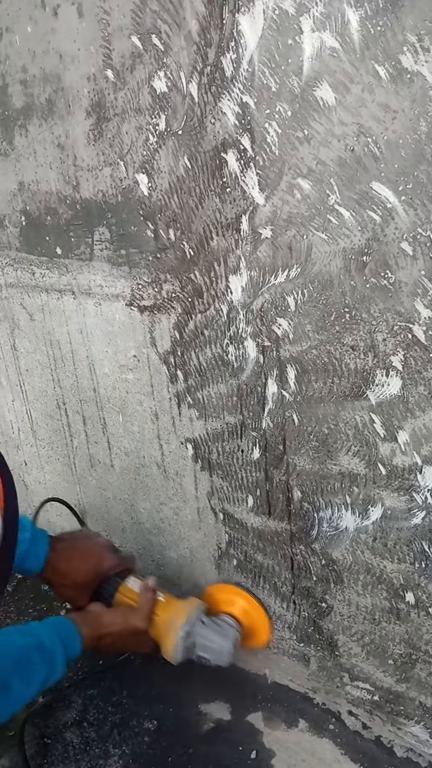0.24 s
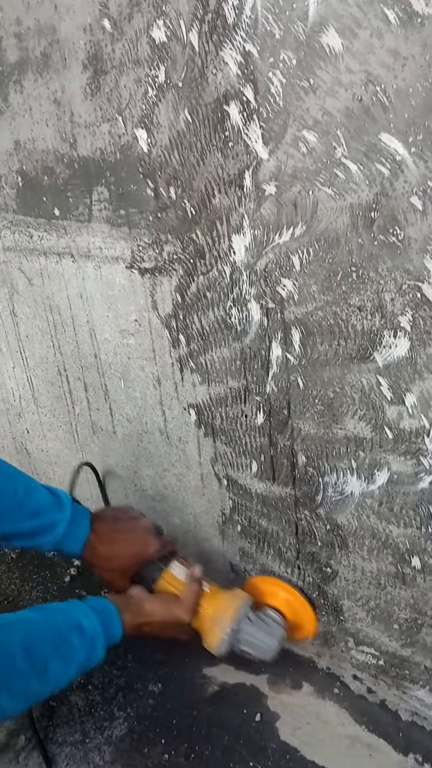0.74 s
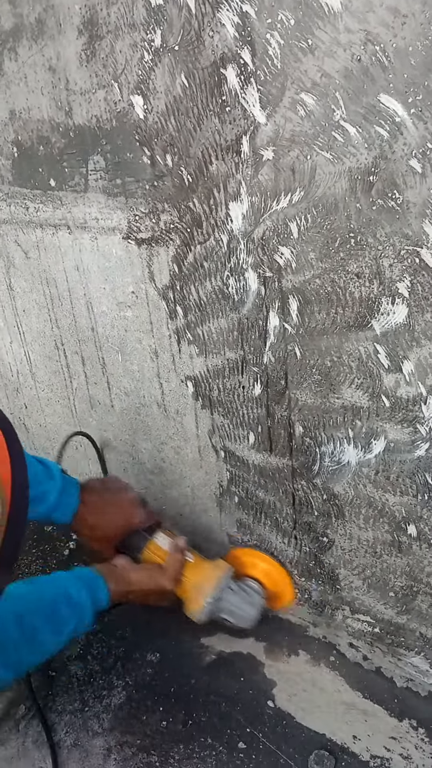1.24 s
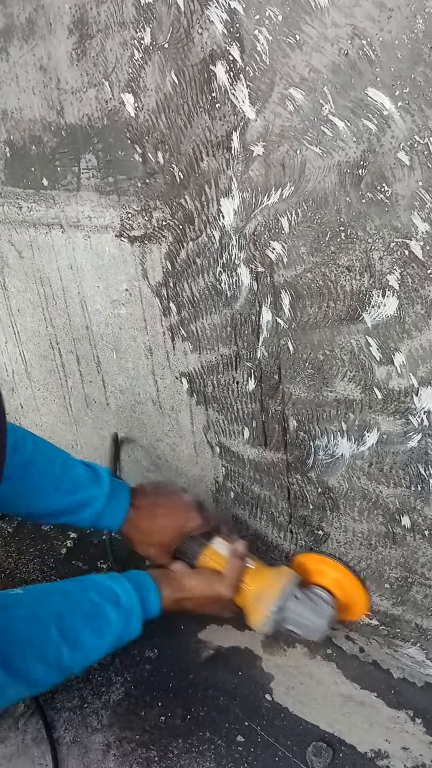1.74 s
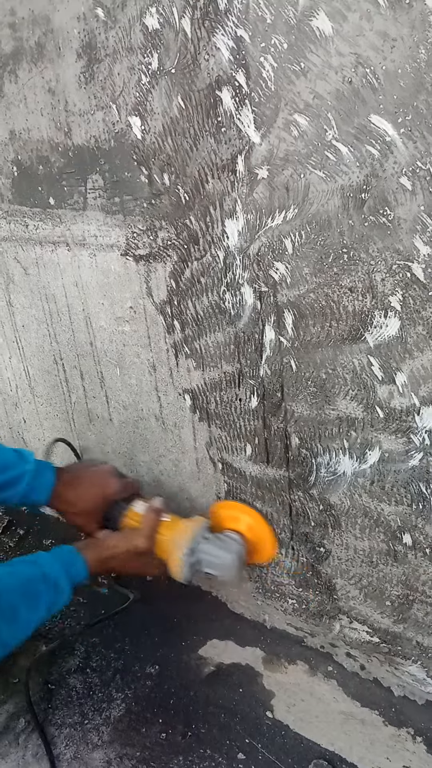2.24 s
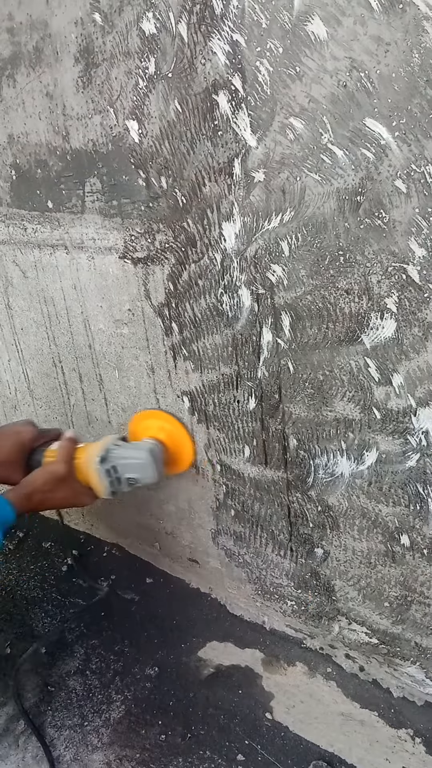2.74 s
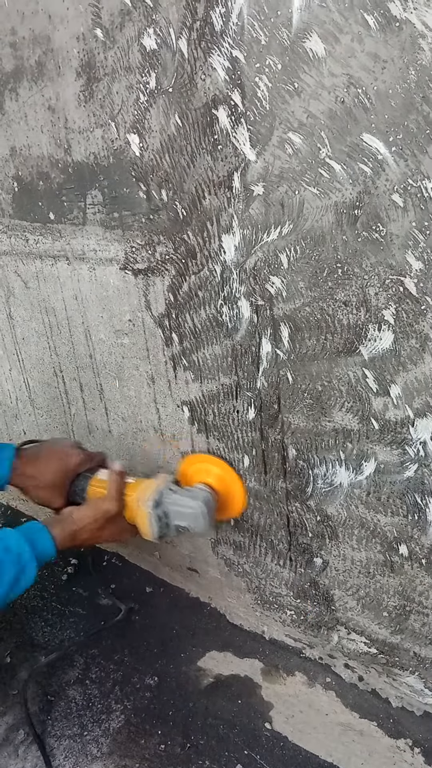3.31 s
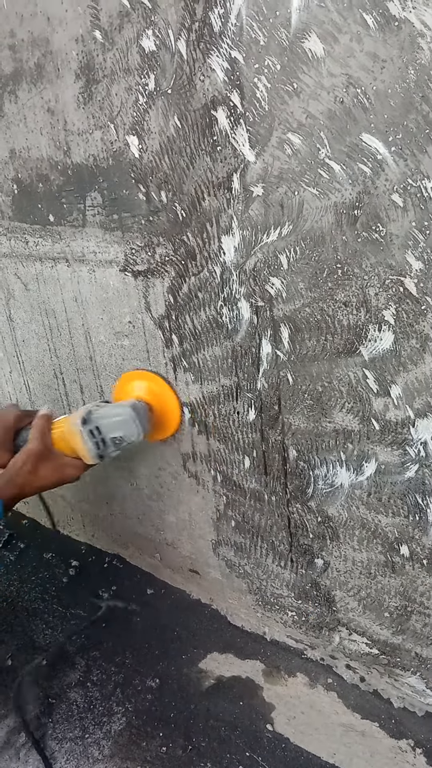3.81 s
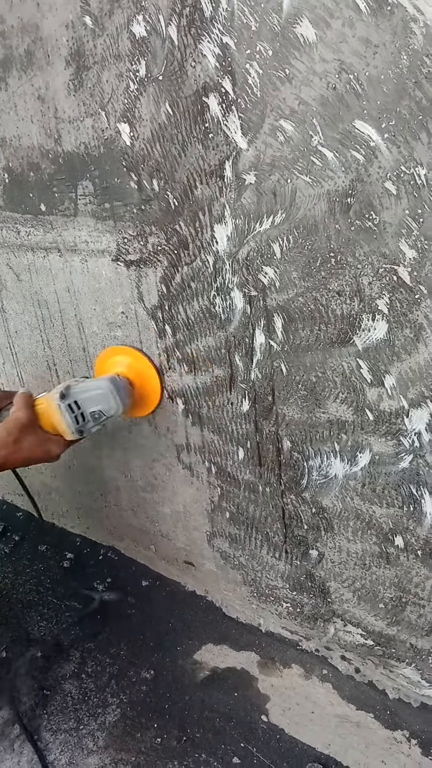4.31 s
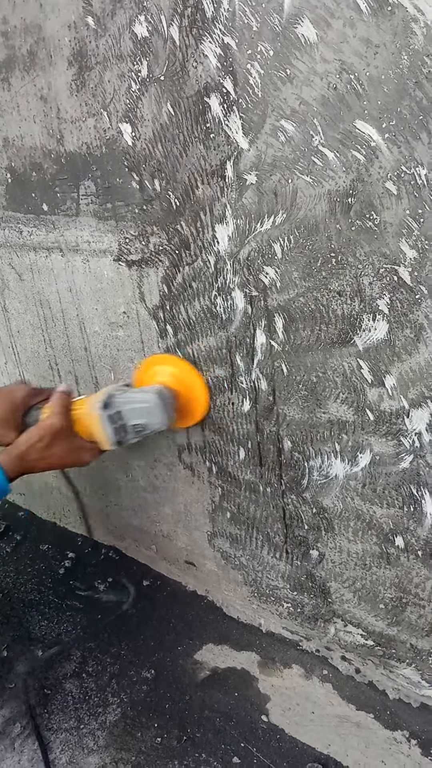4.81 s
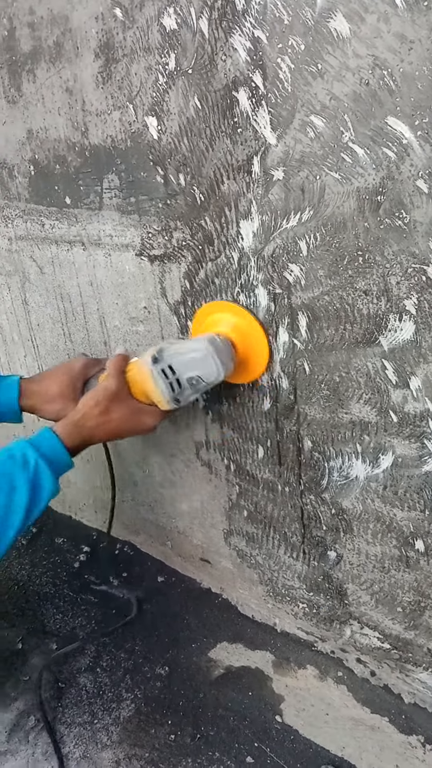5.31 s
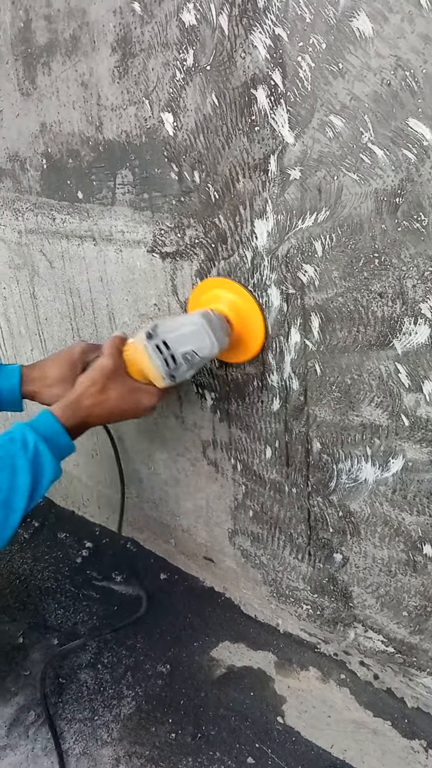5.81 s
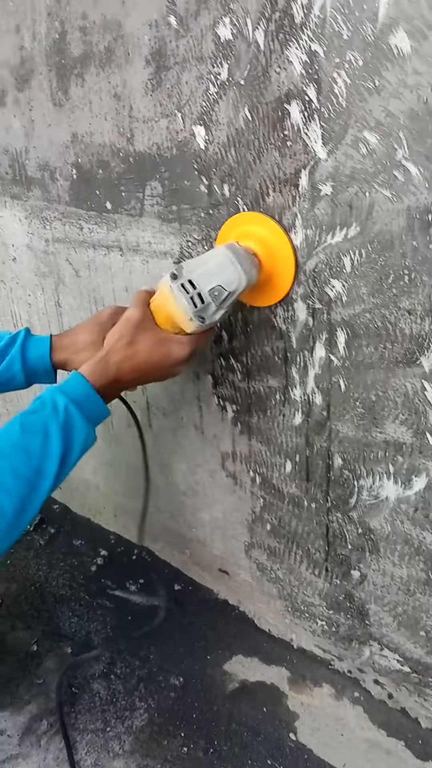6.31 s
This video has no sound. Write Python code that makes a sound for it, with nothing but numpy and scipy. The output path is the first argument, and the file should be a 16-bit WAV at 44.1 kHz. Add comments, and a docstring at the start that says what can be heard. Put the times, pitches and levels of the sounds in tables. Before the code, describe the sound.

From 0 seconds an angle grinder is already at full speed, its steel cup wheel scraping concrete with a loud, bright, gritty rasp that never stops. A fast rough chatter, roughly seventy to a hundred skips a second, textures it, with fine dusty hiss on top. Fan roar and low motor hum lie beneath, and a very thin high whine sags and recovers with each lean. Short runs of hard, rapid knocks come around 0.3, 1.2, 1.8, 2.5 and 3.2 seconds. Steely ringing swells briefly throughout, stronger near 2.7. From about 3.8 the wheel presses harder and the rasp thickens and quickens, fullest around 5, with more knocks near 4.3 and 5.3. A hollow body drone comes and goes. Pressure eases toward 6.5, where it cuts off still grinding. Outdoors, dry, a metre or two away.

```python
"""A steel cup wheel on an angle grinder scrapes and chatters on a concrete wall, a metre or two away outdoors.
Skips and hops form one contact force; it modulates noise for scrape, knocks and dust, and rings steel modes.
Wheel, rim, guard and gear head are two-pole resonances whose levels follow pressure and listed swells.
Underneath: coloured-noise fan roar, sine rotor hum and a thin blade whine that sags at each lean."""
import sys
import numpy as np
from scipy import signal
from scipy.fft import rfft, irfft
from scipy.io import wavfile
from scipy.ndimage import uniform_filter1d, map_coordinates

SR = 44100
rng = np.random.default_rng(int(sys.argv[2]) if len(sys.argv) > 2 else 0)


def output_pcm(signal):
    """Save a mono or channel-first signal as 16-bit PCM at the path in sys.argv[1].

    Samples are clipped to [-1, 1] before scaling.
    """
    pcm = np.clip(np.atleast_2d(signal).T, -1, 1) * 32767
    wavfile.write(sys.argv[1], SR, np.round(pcm).astype(np.int16))


N = 288855

# scrape spectrum: [f/Hz, relative density/dB]
SCRAPE_SPECTRUM = [(500, -9.5), (900, 1.5), (1700, -23), (2050, 5.5), (3000, 4.5), (4200, 3), (5100, 5.5),
                   (5800, 3.5), (6250, 2), (6600, 3), (6900, 0.5), (8000, 0), (9600, -40), (12000, -22)]


def scrape(rub, scrape_db):
    """Rubbing breaks grit: coloured noise under the rub envelope."""
    return colour(rub * grit(spread_db=0.5), SCRAPE_SPECTRUM) * undb(scrape_db - 3.5)


# knock spectrum: [f/Hz, relative density/dB]
KNOCK_SPECTRUM = [(100, -14), (400, -21), (900, -6.5), (1650, -15.5), (2050, -1), (3000, -4.5), (3650, -1),
                  (4300, -4.5), (5300, -2.5), (7000, -5), (9000, -14.5), (10500, -21), (13000, -21),
                  (15500, -25)]


def knocks(knock_force):
    """Hard bounces: noise bursts shaped by the impact force."""
    return colour(knock_force * grit(spread_db=3.5), KNOCK_SPECTRUM) * undb(2.5)


# even-paced hops, one hop = lone knock: [first t/s, last t/s, hops/count, relative level/dB]
HOP_RUNS = [(0.231, 0.35, 5, -28), (0.39, 0.417, 2, -26), (0.626, 0.685, 4, -28), (1.026, 1.052, 2, -27),
            (1.155, 1.345, 8, -27.5), (1.434, 1.448, 2, -26.5), (1.738, 1.867, 5, -28.5),
            (2.474, 2.579, 4, -28), (2.702, 2.728, 2, -25), (2.824, 2.871, 3, -25), (2.951, 2.975, 2, -26),
            (3.096, 3.286, 7, -27.5), (3.997, 4.022, 2, -25.5), (4.222, 4.401, 6, -25.5),
            (4.613, 4.613, 1, -25), (4.873, 4.906, 2, -27), (5.057, 5.057, 1, -25),
            (5.166, 5.227, 3, -26.5), (5.27, 5.395, 5, -25), (5.577, 5.577, 1, -25), (5.842, 5.842, 1, -25),
            (5.893, 5.948, 3, -27.5), (6.199, 6.276, 4, -26.5)]
# softer bounces between runs; nominal rate, spread of the softening
STRAYS_PER_S, STRAY_MAX_DB, STRAY_SPREAD_DB = 11, -28, 1.5


def bounces():
    """Times and levels of hard bounces: even runs plus random strays away from them."""
    run_times, run_db = [], []
    for first_s, last_s, hops, level_db in HOP_RUNS:
        run_times.append(np.linspace(first_s, last_s, round(hops)))
        run_db.append(np.full(round(hops), level_db))
    times, hop_db = np.concatenate(run_times), np.concatenate(run_db)
    gap, size = rng.standard_normal((200, 2)).T
    strays = np.cumsum(np.exp(.5 * gap)) / STRAYS_PER_S
    clear = np.abs(strays[:, None] - times).min(axis=1) > .025
    free = clear & (strays < (N - 1) / SR)
    stray_db = STRAY_MAX_DB - STRAY_SPREAD_DB * np.abs(size[free])
    return np.r_[times, strays[free]], np.r_[hop_db, stray_db]


def hopping():
    """1 in runs of three hops or more, else 0, with smoothed edges."""
    t = np.arange(N) / SR
    inside = np.zeros(N)
    for first_s, last_s, hops, _ in HOP_RUNS:
        if hops > 2:
            inside += (t > first_s - .02) * (t < last_s)
    return uniform_filter1d(inside, size=500)


# nominal skip rate at usual pressure; increase with pressure
SKIPS_PER_S, SKIPS_PER_S_PER_DB = 84, 5.5


def skips(bounce_times, pressure_db, uneven, spread_db):
    """Times and sizes of small uneven skips, faster under pressure and smaller near hard bounces."""
    gap, size = rng.standard_normal((900, 2)).T
    t = np.arange(N) / SR
    count = np.cumsum(SKIPS_PER_S + SKIPS_PER_S_PER_DB * pressure_db) / SR
    times = np.interp(np.cumsum(np.exp(uneven * gap)), count, t, right=-1)  # -1: past the end
    to_bounce_s = np.abs(times[:, None] - bounce_times).min(axis=1)
    return times, undb(spread_db * size) * np.clip(to_bounce_s / .016, .35, 1)


def bites(times, sizes, rise_s, fall_s):
    """Contact force: fast bite, slower lift-off; overlapping touches add in power."""
    touches = np.zeros(N)
    inside = (times >= 0) & (times < (N - 1) / SR)
    np.add.at(touches, (times[inside] * SR).astype(int), sizes[inside] ** 2)
    t = np.arange(SR // 10) / SR
    shape = (1 - np.exp(-t / rise_s)) * np.exp(-t / fall_s)
    power = signal.fftconvolve(touches, (shape / shape.max()) ** 2)[:N]
    return np.sqrt(np.abs(power))


def airborne(times, heights, depth):
    """Rub gain: drops before a bounce while the wheel is off the wall, more for higher hops."""
    before = bites((N - 1) / SR - times, heights, rise_s=.001, fall_s=.012)[::-1]
    return 1 / (1 + depth * before)


# rubbed parts, by name: [relative level at usual force/dB, pressure slope/(dB/dB), waver/dB]
PART_DRIVE = {"scrape": (-29, 0.32, 0.17), "guard": (-37, -0.038, 0.62), "head": (-39.5, 0.61, 0.48),
              "dust": (-40, 0.29, 1), "rim": (-41.5, 0.25, 2.1), "low": (-38, 0.13, 2.1),
              "middle": (-40, 0, 2.5), "high": (-37, -1, 2.1), "top": (-35.5, -0.03, 2.6)}
# swells of one part: [start t/s, length/s, part/name, relative level/dB]
PART_SWELLS = [(0.01, .21, "guard", -36), (0.312, 0.099, "rim", -36), (0.378, 0.088, "top", -31),
               (0.387, 0.079, "low", -28.5), (0.492, 0.099, "guard", -31.5), (0.59, 0.17, "high", -32),
               (0.602, .07, "middle", -28.5), (0.64, 0.56, "top", -33.5), (0.75, 0.3, "guard", -38.5),
               (1.106, 0.13, "high", -31), (1.152, 0.1, "top", -42), (1.027, 0.075, "middle", -34),
               (1.273, 0.16, "middle", -34), (1.517, .05, "middle", -31), (1.29, .17, "low", -36),
               (1.38, .32, "guard", -40), (1.522, 0.25, "high", -32), (1.856, 0.25, "guard", -37),
               (1.915, .05, "middle", -33), (2.02, 0.14, "low", -32.5), (2.046, 0.25, "head", -35),
               (2.327, 0.079, "low", -29.5), (2.525, 0.21, "low", -30), (2.547, 0.99, "high", -37.5),
               (2.6, 0.8, "head", -41.5), (2.673, 0.085, "low", -24), (2.832, 0.17, "low", -29),
               (2.906, 0.25, "dust", -38), (3.047, 0.59, "top", -35.5), (3.08, 0.16, "low", -28.5),
               (3.317, 0.1, "low", -33), (3.537, 0.13, "high", -29), (3.65, 0.061, "low", -27),
               (3.82, 0.073, "middle", -31), (3.9, .06, "low", -34), (4.09, 0.1, "top", -31.5),
               (4.26, 0.054, "middle", -32), (4.397, 0.16, "rim", -33.5), (4.702, .6, "rim", -43),
               (4.8, 0.32, "guard", -37), (5.02, 0.21, "low", -32), (5.248, .2, "top", -32.5),
               (5.37, .05, "middle", -34), (5.486, .06, "low", -28), (5.55, 0.9, "guard", -40),
               (5.597, .25, "middle", -37), (5.895, 0.16, "middle", -31.5), (6.16, 0.048, "middle", -26.5),
               (6.1, 0.43, "dust", -42), (6.242, 0.39, "low", -36.5), (6.414, 0.14, "top", -33),
               (6.425, 0.044, "high", -29)]
WAVERS_PER_S = 12
SWELL_RISE_S, SWELL_FALL_S = .025, .035  # centred on start and end


def drive_db(part, pressure_db):
    """Level of one rubbed part: pressure and random waver, plus the power of its listed swells."""
    usual_db, db_per_db, waver_db = PART_DRIVE[part]
    t = np.arange(N) / SR
    power = undb(usual_db + db_per_db * pressure_db + waver_db * walk(WAVERS_PER_S)) ** 2
    for start_s, length_s, name, swell_db in PART_SWELLS:
        if name == part:
            rise = (t - start_s) / SWELL_RISE_S
            fall = (start_s + length_s - t) / SWELL_FALL_S
            swell = np.clip(np.minimum(rise, fall) + .5, 0, 1)
            power = power + (undb(swell_db) * swell) ** 2
    return 10 * np.log10(power)


# wheel modes, one table per family: [f/Hz, width/Hz, relative level/dB]
WHEEL_LOW = [(2342, 65, -11), (5320, 46, 0)]
WHEEL_MIDDLE = [(6100, 36, -9), (6457, 24, 0)]
WHEEL_HIGH = [(8468, 45, 0), (8728, 55, -1)]
WHEEL_TOP = [(9052, 36, -3), (9190, 44, 0)]


def wheel(force, pressure_db):
    """Four steel mode families rung by grit; levels swell as the rubbing spot makes them sing."""
    out = 0
    families = {"low": WHEEL_LOW, "middle": WHEEL_MIDDLE, "high": WHEEL_HIGH, "top": WHEEL_TOP}
    for name, modes in families.items():
        tone = ring(force * grit(spread_db=4), modes, waver_db=3.0)
        # friction feeds and damps the steel: ring settles at its drive level
        swing = np.sqrt(uniform_filter1d(tone ** 2, size=3500))
        out = out + tone / swing * undb(drive_db(name, pressure_db))
    return bend(out, depth=0.0018, rate=18)


def bend(x, depth, rate):
    """Pitch bends slightly up and down through a randomly varying delay."""
    lag = depth * SR / (np.pi * rate) * walk(rate)
    return map_coordinates(x, [np.arange(N) + lag], order=3, mode="reflect")


# damped guard resonances: [f/Hz, width/Hz, relative level/dB]
GUARD_MODES = [(2200, 350, -5), (3430, 260, -1), (3720, 280, 0)]


def guard(jolts, pressure_db):
    """Each skip or bounce jolts the guard into a short tick."""
    tone = ring(jolts * grit(spread_db=3.0), GUARD_MODES, waver_db=2.0)
    return tone * undb(drive_db("guard", pressure_db))


# lower gear-head resonances: [f/Hz, width/Hz, relative level/dB]
HEAD_MODES = [(1995, 60, 0), (2430, 240, 1), (3000, 80, -6)]


def gear_head(force, pressure_db):
    """Contact force rings the gear head."""
    tone = ring(force * grit(spread_db=2.0), HEAD_MODES, waver_db=4)
    return tone * undb(drive_db("head", pressure_db))


# rim, damped where pressed flat on the wall: [f/Hz, width/Hz, relative level/dB]
RIM_MODES = [(4780, 50, -5), (4970, 300, 0), (5180, 60, -2)]


def rim(force, pressure_db):
    """Contact force rings the damped rim."""
    tone = ring(force * grit(spread_db=0.5), RIM_MODES, waver_db=3.5)
    return tone * undb(drive_db("rim", pressure_db) + 1.0)


# dust hiss spectrum: [f/Hz, relative density/dB]
DUST_SPECTRUM = [(6000, -11), (7900, -35), (8350, 15), (9200, 1), (9450, 4), (9900, 0.5), (10700, -4),
                 (11300, -33), (12000, 3), (12600, -20), (13700, -10), (14600, 5), (15700, 6), (18000, -4)]


def dust(force, dust_db):
    """Grit hisses: coloured noise under the force plus a steady floor."""
    grains = unit(np.hypot(1.1, force)) * grit(spread_db=5.0)
    return colour(grains, DUST_SPECTRUM) * undb(dust_db + 4.5)


# faint wheel overtones: [f/Hz, width/Hz, relative level/dB]
OVERTONES = [(11325, 30, -7), (11688, 28, -9), (11883, 34, -7), (12258, 26, -10), (13000, 50, -7),
             (13942, 40, -4), (15415, 60, 0)]


def shimmer(force, dust_db):
    """Faint wheel overtones rung by grit, sharing the dust level."""
    return ring(force * grit(spread_db=6.5), OVERTONES, waver_db=3.5) * undb(dust_db - 2.5)


# hollow tool-body resonances: [f/Hz, width/Hz, relative level/dB]
BODY_MODES = [(724, 86, 12), (838, 54, 13.5)]
# body drone: [t/s, level/dB]
BODY_DRONE = [(0, -49), (.12, -42.5), (.4, -53), (1.35, -42), (2.4, -52), (3.5, -57), (3.85, -42.5),
              (4.2, -45.5), (4.8, -40.5), (5.05, -51), (5.4, -44), (6.55, -45)]


def body(rub):
    """Rubbing rings the hollow tool body into a drone."""
    return ring(rub * grit(spread_db=0), BODY_MODES, waver_db=1.0) * undb(curve(BODY_DRONE))


# tool leaned on, motor slows: [deepest sag t/s, length/s, whine sag/Hz]
LEANS = [(.21, .7, 1080), (.65, .6, 900), (1.12, .85, 720), (1.76, .65, 1300), (2.38, .4, 530),
         (3.0, .7, 820), (4.2, .65, 650), (4.68, .65, 1150), (5.27, .65, 1000), (5.86, .55, 1050),
         (6.35, .6, 1030)]


def lean_sag_hz():
    """Sag of the whine: one cosine-squared dip per lean, overlaps add."""
    t = np.arange(N) / SR
    sag_hz = np.zeros(N)
    for deepest_s, length_s, depth_hz in LEANS:
        phase = np.pi * np.clip((t - deepest_s) / length_s, -.5, .5)
        sag_hz += depth_hz * np.cos(phase) ** 2
    return sag_hz


# whine: [t/s, level/dB]
WHINE_LEVEL = [(0, -47), (.42, -44), (1.2, -63), (1.8, -52), (2.14, -52), (3, -50), (3.7, -46), (4.15, -54),
               (4.7, -41), (5.3, -55), (6.55, -55)]
FREE_WHINE_HZ, FAN_BLADES = 11280, 31


def whine(turn):
    """Blade-pass sine, one cycle per blade."""
    return np.sin(FAN_BLADES * turn) * undb(curve(WHINE_LEVEL))


# fan spectrum: [f/Hz, relative density/dB]
FAN_SPECTRUM = [(28, -34), (42, -27), (62, -11), (110, 0), (200, -1.5), (270, -1), (370, -4.5), (580, -3),
                (800, -13), (1050, -2), (1300, 1), (1650, -4), (3000, -8.5), (9000, -20)]
# fan and rotor level: [t/s, relative level/dB]
MOTOR_LEVEL = [(0, 0.2), (0.8, -1.5), (1.4, -0.9), (1.8, -1.5), (2.4, 0.7), (4.6, 1.1), (5.6, 1.2),
               (6.55, 0.5)]
FAN_DB, FAN_DB_PER_HZ = -38, -0.0011  # slope per Hz of whine sag


def fan(sag_hz):
    """Turbulent roar: coloured noise that sinks as the motor slows."""
    level_db = FAN_DB + curve(MOTOR_LEVEL) + FAN_DB_PER_HZ * sag_hz + 1.9 * walk(13)
    return colour(rng.standard_normal(N), FAN_SPECTRUM) * undb(level_db)


# unbalanced rotor: [multiple of its speed, relative level/dB]
ROTOR_ORDERS = [(1, -57), (2, -56), (3, -57)]
ROTOR_DB_PER_HZ = -0.0044  # per Hz of whine sag


def rotor(turn, sag_hz):
    """Imbalance hums at multiples of shaft speed and sinks as the motor slows."""
    hum = sum(undb(order_db) * np.sin(k * turn) for k, order_db in ROTOR_ORDERS)
    return hum * undb(3.0 + curve(MOTOR_LEVEL) + ROTOR_DB_PER_HZ * sag_hz)


# motor-housing hum: [f/Hz, width/Hz, relative level/dB]
HOUSING_MODES = [(108.6, 14, 7), (151, 4.7, 4.5), (204, 31, -3), (265.2, 1.9, -2.5)]


def housing():
    """Noise-driven housing resonances hum at a constant overall level."""
    return ring(rng.standard_normal(N), HOUSING_MODES, waver_db=1.0) * undb(-51.5)


def motor(flutter_hz):
    """One shaft angle, slowed by leans and fluttering, turns rotor and blades; fan and housing add."""
    sag_hz = lean_sag_hz()
    whine_hz = FREE_WHINE_HZ - sag_hz + flutter_hz * walk(120)
    turn = 2 * np.pi * np.cumsum(whine_hz) / SR / FAN_BLADES
    return rotor(turn, sag_hz) + whine(turn) + fan(sag_hz) + housing()


def undb(db):
    """Decibels to gain."""
    return 10 ** (np.asarray(db) / 20)


def unit(x):
    """Scale to rms 1."""
    return x / np.sqrt(np.mean(x ** 2))


def curve(table):
    """(t/s, value) points joined by straight lines."""
    return np.interp(np.arange(N) / SR, *np.transpose(table))


def walk(rate):
    """Smooth chance, rms 1, rate draws per second."""
    steps = signal.resample_poly(rng.standard_normal(2048), 10, 1)
    return unit(np.interp(np.arange(N) / SR * rate * 10, np.arange(len(steps)), steps))


def grit(spread_db):
    """Grains of uneven size snapping off: rms-1 noise, level redrawn every 8 samples."""
    size_db = np.repeat(rng.standard_normal(N // 8 + 1), 8)[:N] * spread_db
    return unit(rng.standard_normal(N) * undb(size_db))


def colour(x, spectrum):
    """Filter by (f/Hz, dB) points; white noise keeps its power."""
    hz, db = np.transpose(spectrum)
    f = np.arange(N + 1) * SR / (2 * N)
    gain = unit(undb(np.interp(np.log(f + 1), np.log(hz), db)))
    return irfft(rfft(x, 2 * N) * gain)[:N]


def ring(x, modes, waver_db):
    """Drive two-pole resonances with wavering levels; sum scaled to rms 1."""
    out = 0
    for hz, width_hz, db in modes:
        b, a = signal.iirpeak(hz, hz / width_hz, fs=SR)
        out = out + undb(db + waver_db * walk(14)) * unit(signal.lfilter(b, a, x))
    return unit(out)


# wheel pressed on the wall: [t/s, force about usual/dB]
PRESSURE = [(0, -0.62), (0.25, -3), (1.25, -4), (1.45, -1.96), (1.8, -3.5), (2.15, 0), (2.45, -3),
            (2.75, -0.44), (3.5, -0.73), (3.8, 1.8), (4.25, 0.78), (4.5, 2), (5.1, 3), (5.4, 2), (5.8, 2),
            (6.55, -2.2)]
RUN_RUB_DB = -0.5  # less wall contact during hop runs, before rms scaling


def scene():
    """Skips and bounces give the contact force that drives all grinding layers; the motor runs beneath."""
    pressure_db = curve(PRESSURE)
    scrape_db, dust_db = drive_db("scrape", pressure_db), drive_db("dust", pressure_db)
    times, bounce_db = bounces()
    sizes = undb(bounce_db)
    skip_times, skip_sizes = skips(times, pressure_db, uneven=.2, spread_db=1.5)
    hop_db = bounce_db - scrape_db[(times * SR).astype(int)]
    touching = airborne(times, undb(hop_db) ** 2, depth=0.14) * undb(RUN_RUB_DB * hopping())
    chatter = unit(bites(skip_times, skip_sizes, rise_s=0.00054, fall_s=0.017))
    rub = unit(touching * np.hypot(.65, chatter))
    knock_force = bites(times, sizes, rise_s=.0009, fall_s=.0062)
    force = unit(np.hypot(rub * undb(scrape_db + 5.5), knock_force))
    jolt_sizes = np.r_[skip_sizes, sizes / sizes.mean()]
    jolts = bites(np.r_[skip_times, times], jolt_sizes, rise_s=0.0002, fall_s=0.006)
    grinding = scrape(rub, scrape_db) + knocks(knock_force) + wheel(force, pressure_db)
    grinding += guard(jolts, pressure_db) + gear_head(force, pressure_db) + rim(force, pressure_db)
    grinding += dust(force, dust_db) + shimmer(force, dust_db) + body(rub)
    return (grinding + motor(flutter_hz=36))[None]


TOP_HZ = 15720


def record(dry):
    """The phone rolls off deep bass below 52 Hz and cuts steeply above TOP_HZ."""
    thin = signal.sosfilt(signal.butter(3, 52, "highpass", fs=SR, output="sos"), dry)
    return signal.sosfilt(signal.ellip(12, .1, 80, TOP_HZ, fs=SR, output="sos"), thin)


dry = scene()
out = record(dry)
output_pcm(out)
```